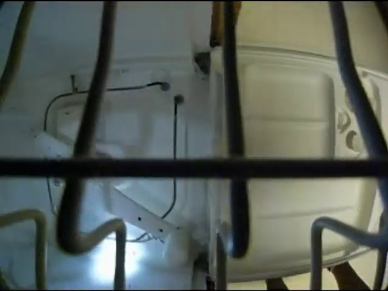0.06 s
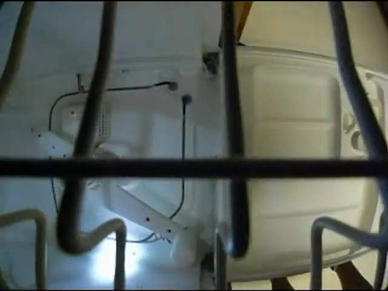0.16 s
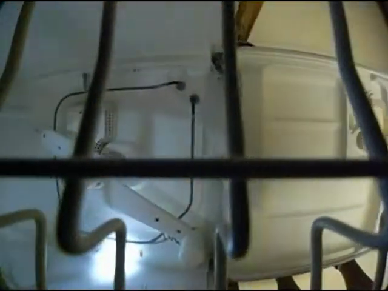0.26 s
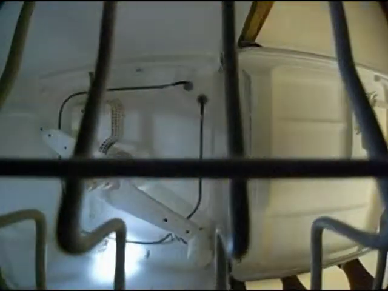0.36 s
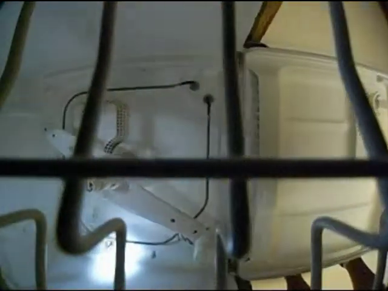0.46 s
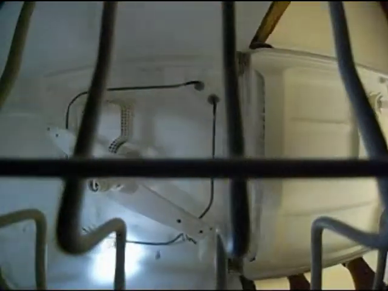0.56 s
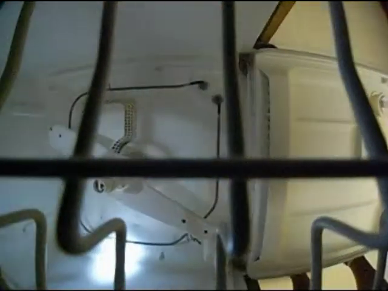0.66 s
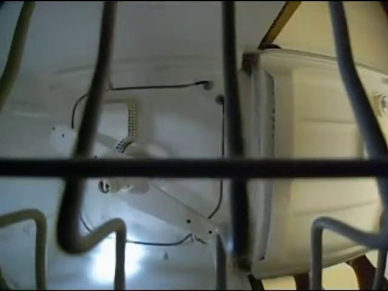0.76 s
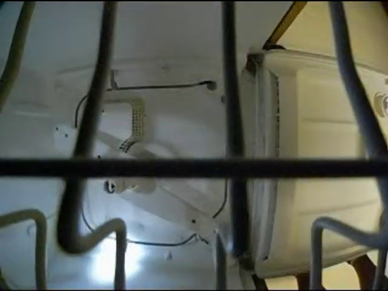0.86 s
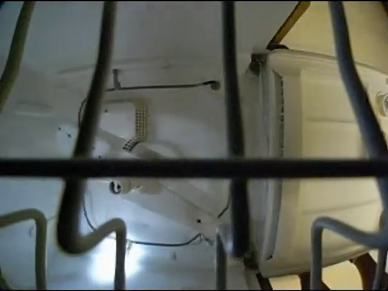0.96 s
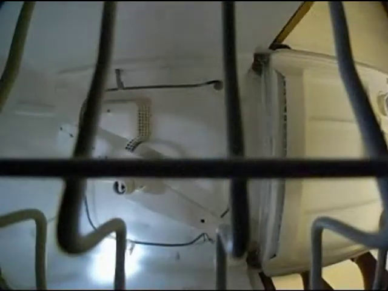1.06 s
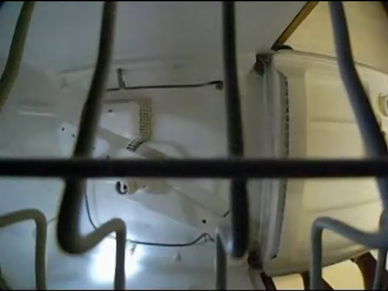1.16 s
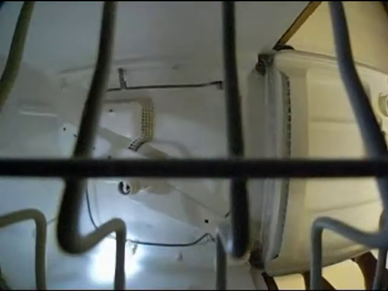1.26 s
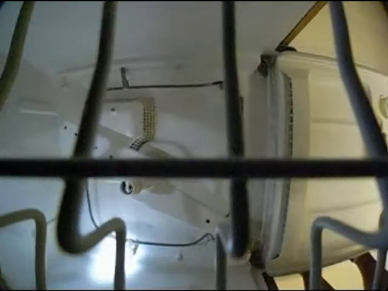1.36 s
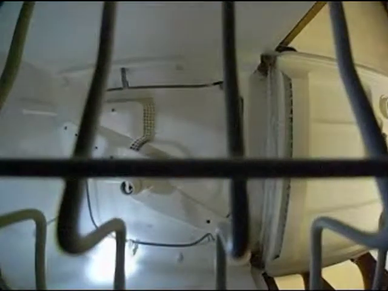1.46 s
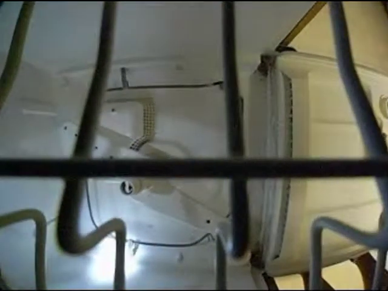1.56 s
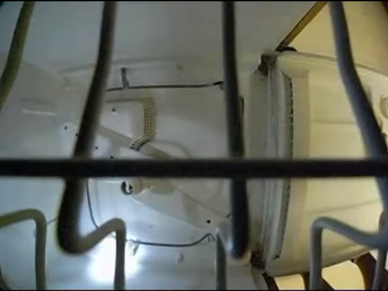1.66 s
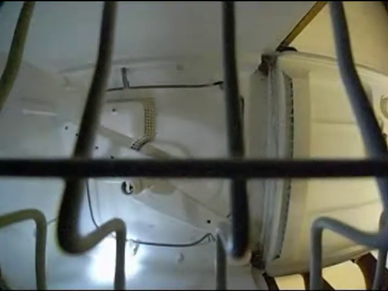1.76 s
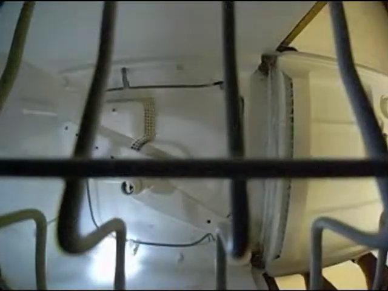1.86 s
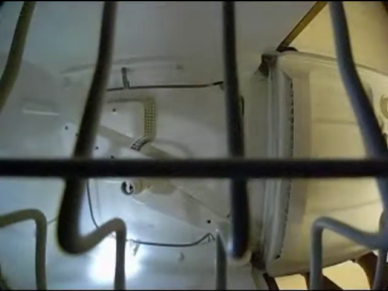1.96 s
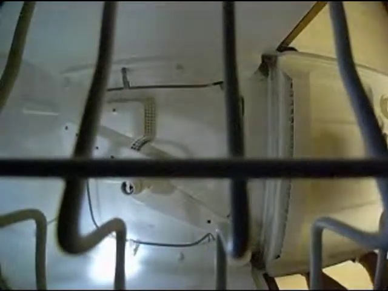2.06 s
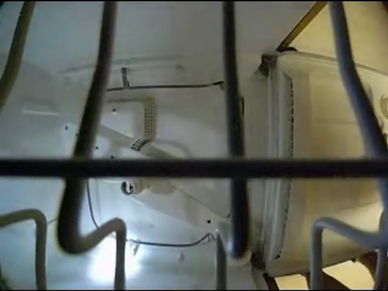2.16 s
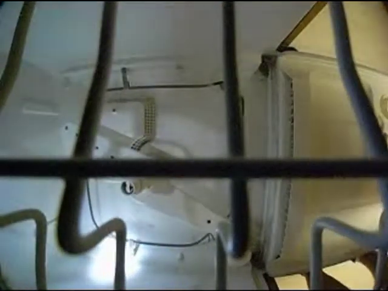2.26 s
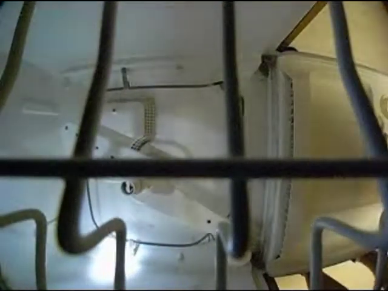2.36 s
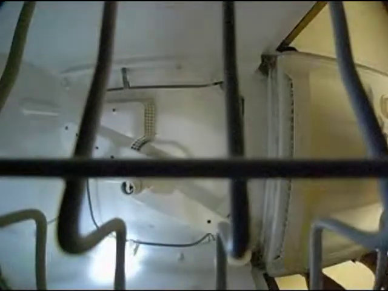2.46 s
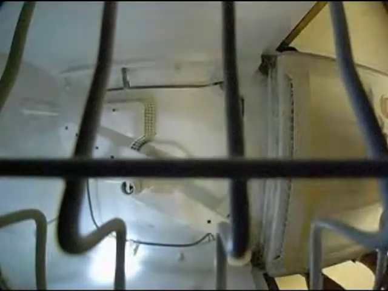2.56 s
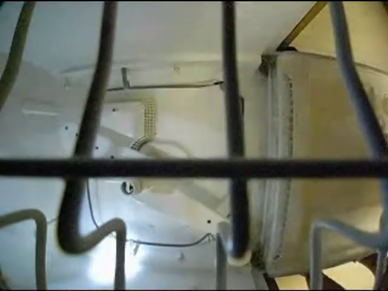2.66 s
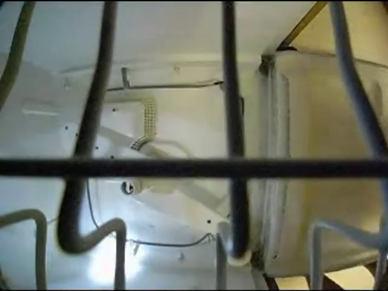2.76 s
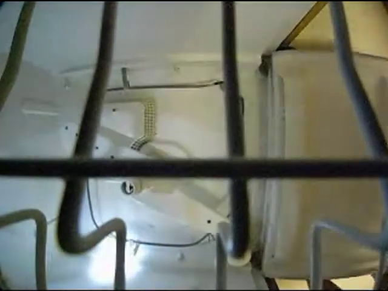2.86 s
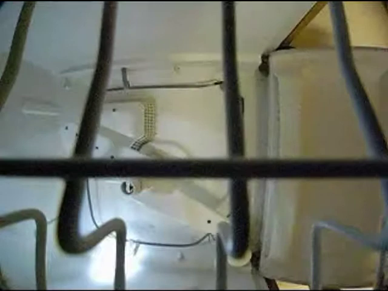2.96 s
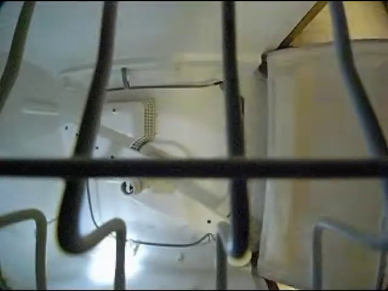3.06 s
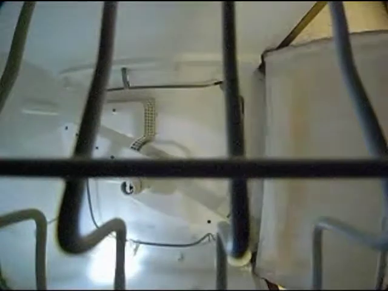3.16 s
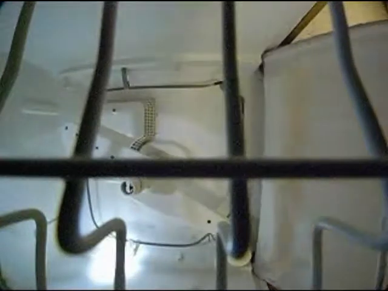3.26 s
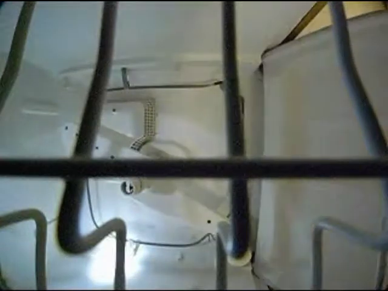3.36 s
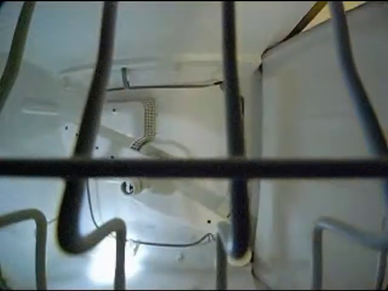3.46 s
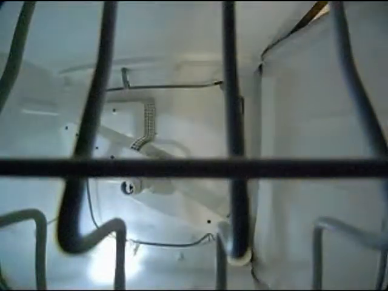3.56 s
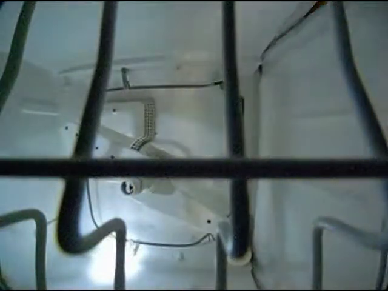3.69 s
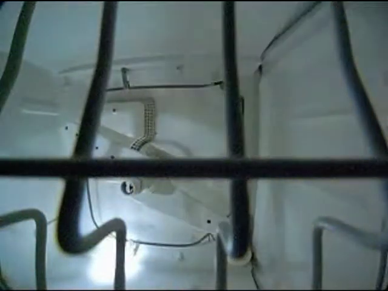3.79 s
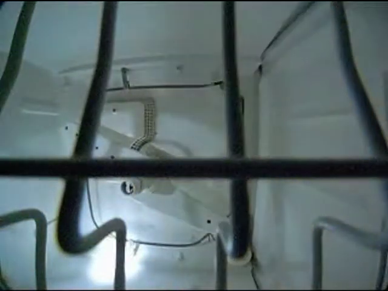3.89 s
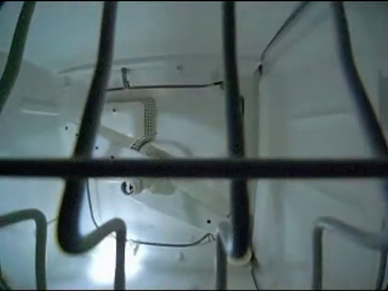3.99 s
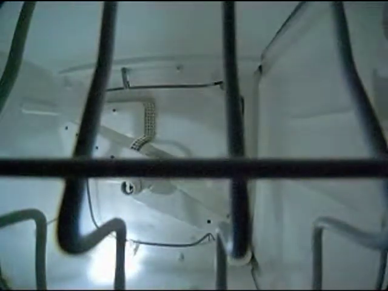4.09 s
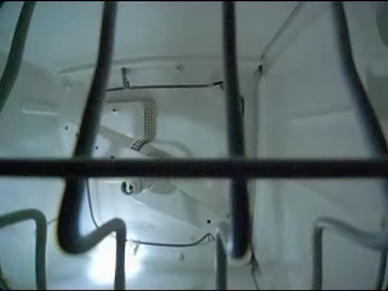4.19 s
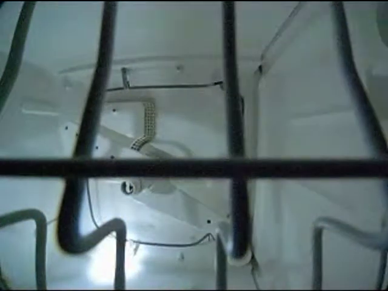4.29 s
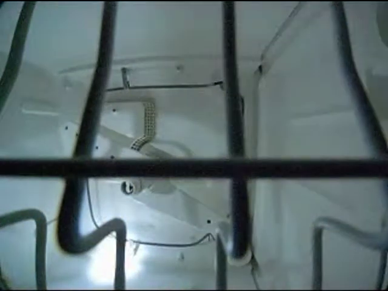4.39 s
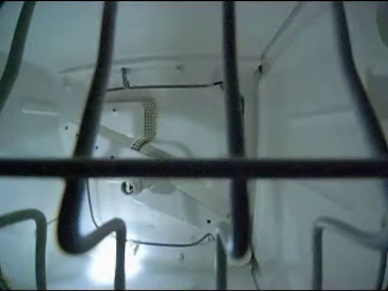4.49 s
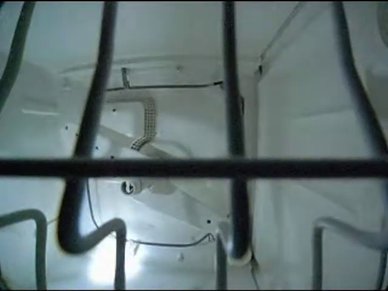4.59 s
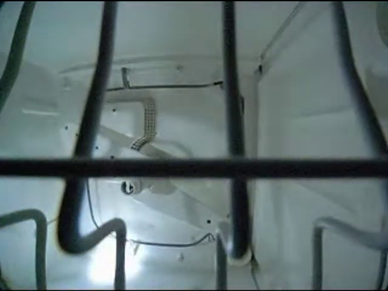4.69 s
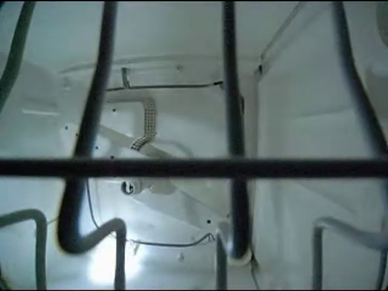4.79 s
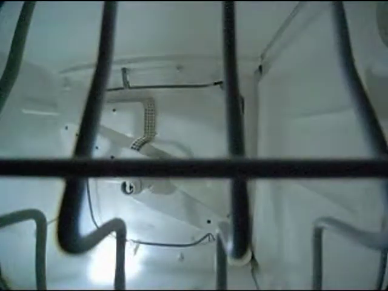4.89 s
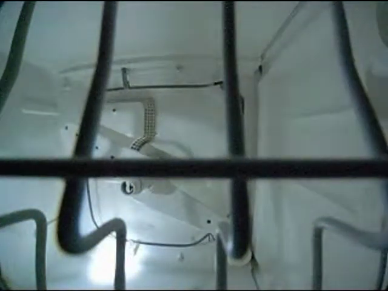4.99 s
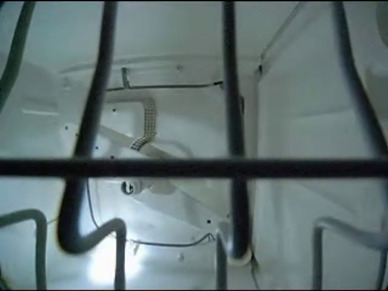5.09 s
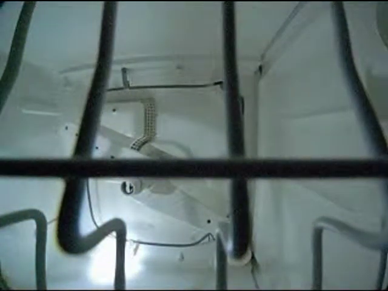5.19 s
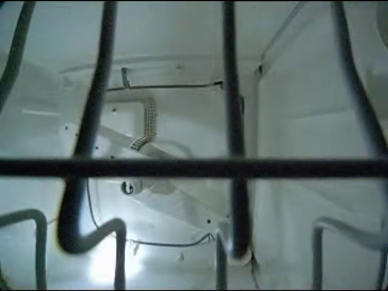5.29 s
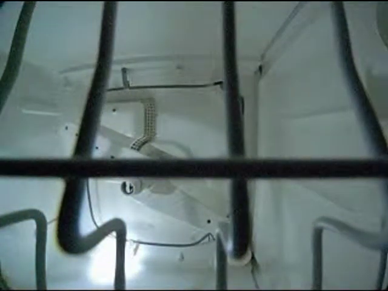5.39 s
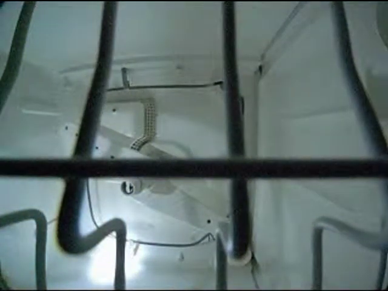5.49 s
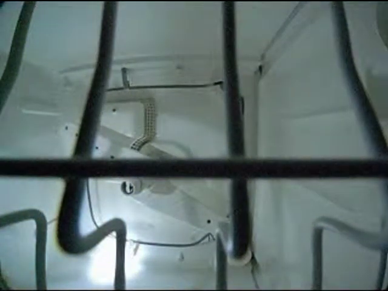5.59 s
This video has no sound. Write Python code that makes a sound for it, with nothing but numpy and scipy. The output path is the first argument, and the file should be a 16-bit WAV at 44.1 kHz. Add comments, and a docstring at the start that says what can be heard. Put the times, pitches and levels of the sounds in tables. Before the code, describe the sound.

A close microphone inside the resonant tub catches a rack rumbling loudly over rails, jolting unevenly and stopping with a metallic knock. The door then moves almost silently, with only low, soft thuds. It shuts in a hard, dull bang and double latch snap; a second, weaker scrape, knock and rattle follows, fading into steady soft hiss.

```python
"""Inside a dishwasher: a wire rack rolls in over its rails, chirps and skids, bumps to a stop and rings on.
The door swings up with dull thuds, knocks shut with a latch click, and the latch is scraped and rattled home.
Streams of random jolts, filtered by the tub's resonances, make the rolling and shaking; single blows make
the knocks. Struck metal is decaying sines, sliding is filtered micro-slips, thuds and hiss are filtered noise."""
import sys
import numpy as np
from scipy import signal
from scipy.fft import rfft, irfft, next_fast_len
from scipy.io import wavfile
from scipy.ndimage import uniform_filter1d

SR = 44100
rng = np.random.default_rng(int(sys.argv[2]) if len(sys.argv) > 2 else 0)


def digitize_waveform(pressure):
    """Quantize a signal to 16-bit integers and store it at the path in sys.argv[1].

    Rows of a 2-D input are taken as channels; values are limited to [-1, 1].
    """
    field = np.atleast_2d(pressure).T
    bounded = np.clip(field, -1, 1)
    quanta = np.round(bounded * 32767).astype(np.int16)
    wavfile.write(sys.argv[1], SR, quanta)


N = 248724
TIME = np.arange(N) / SR

# Background and tub
# colour of the steady hiss: f/Hz, level/dB
HISS_COLOUR = [(25, -13), (120, -2), (400, -1), (550, -9), (1000, -12.5), (2700, -20), (5000, -30),
               (6500, -41), (10000, -46.5)]
# resonances of the tub: f/Hz, width/Hz, lift/dB
TUB_RESONANCES = [(78.7, 6.8, 8), (124.2, 6.6, 6.5), (188, 6.7, 1.5), (217, 28, 8), (296.8, 15.5, 6.5),
                  (366.2, 22.4, 8.5), (404.6, 29.3, 7.5), (580, 30.6, 7.5), (850, 31, 5.5), (1122, 22, 4),
                  (1297, 40, 6.5), (1584, 120, 7.5)]

# Latch
# latch bar sliding: t/s, level/dB before the fade, f/Hz of the rubbed part
LATCH_SLIDES = [(4.150, -37.5, 1210), (4.639, -39.5, 2910)]
# colour of the sliding latch bar: f/Hz, level/dB
LATCH_SLIDE_COLOUR = [(150, -4), (400, 12.5), (750, -5), (1400, 0), (2100, -9.5), (3500, -15.5),
                      (5500, -18.5), (6500, -29), (11500, -34.5)]
# latch snapping over its catch: t/s, peak level/dB
LATCH_SNAPS = [(4.2158, -13), (4.2195, -9)]
# ring of the snapping latch: f/Hz, level/dB, t60/s
LATCH_SNAP_MODES = [(980, 16, 0.0038), (1376, 3, 0.021), (1700, 0, 0.029), (2100, 1, 0.03),
                    (2476, 1.5, 0.018), (2600, -16, 0.026), (2740, -5.5, 0.025), (3530, -15, 0.026),
                    (4260, -18.5, 0.016), (5365, -13.5, 0.024), (5890, -14, 0.018), (6300, -21, 0.029),
                    (10540, -24, 0.04)]
# latch rattling in its catch: t/s, relative level/dB
LATCH_RATTLES = [(2.871, -42), (4.1895, -16.5), (4.3198, -25.5), (4.352, -25), (4.7585, -18.5),
                 (4.8514, -27), (4.866, -28), (4.8999, -20.5), (4.977, -35), (5.167, -48)]
# ring of the rattling latch: f/Hz, level/dB, t60/s
LATCH_RATTLE_MODES = [(1000, 4, 0.074), (1255, 15, 0.021), (1565, 7, 0.038), (2180, -7, 0.03),
                      (2700, -12.5, 0.025), (3840, -24, .02), (6570, -13, 0.025), (9300, -24.5, 0.039)]

# Door
# how hard the swinging door shakes the tub: t/s, level/dB
DOOR_SWING = [(2.5, -53), (2.8, -53.5), (2.95, -42.5), (3.5, -52), (3.948, -70), (4.1, -82)]
# broad colour of the door: f/Hz, level/dB
DOOR_BODY_COLOUR = [(20, -28), (50, 1.5), (100, 1.5), (180, -0.5), (320, -1.5), (430, 1), (520, -6),
                    (1000, -15), (1600, -36), (2400, -36), (3600, -61.5), (7500, -48), (12500, -67)]
# door shuddering as it is lifted, as it shuts and as the latch is worked:
# t/s, level/dB, attack/s, hold/s, fade/(dB per s), clatter level/dB, latch chatter level/dB
DOOR_SHUDDERS = [(2.542, -36.5, 0.087, 0.051, 83, -22, -27), (4.162, -22.5, 0.071, 0.014, 37, -14, -21),
                 (4.689, -27, 0.038, 0.2, 99, -11.5, -21), (4.982, -32, 0.027, 0.085, 262, -14, -44),
                 (5.159, -39.5, 0.0075, 0.0087, 57, -13, -35)]
# door knocking on hinges, seal and frame: t/s, relative level/dB, bass lift/dB, treble lift/dB
DOOR_BLOWS = [(2.612, -25, 7, 2), (4.151, -41, -7, 7), (4.173, -10, -3.5, 1), (4.188, -0.5, -7, 3.5),
              (4.227, -8, 9, -7), (4.315, -8.5, 5, -9), (4.707, -22.5, -11, -18), (4.757, -14.5, -7.5, 4),
              (4.883, -12, 4, 4), (4.978, -22, -2, 6)]
# ring of the door panel after the slam: f/Hz, level/dB, t60/s
DOOR_PANEL_MODES = [(79.2, -23.5, 0.86), (172.7, -20, 0.8), (198.8, -17.5, 0.8), (243.5, -28, 1.0),
                    (388, -17.5, 0.54), (473, -24, 0.25), (570, -29, 0.44)]
# door panels flexing: t/s, level/dB before swell and fade, f/Hz, t60/s, width/octaves
PANEL_THUDS = [(2.386, -32, 109, 0.46, 0.38), (2.66, -27, 216, 0.32, 0.19),
               (3.216, -32, 127.5, 0.26, 0.094), (5.339, -25, 372, 0.23, 0.26)]

# Rack
# how hard the rolling rack shakes the tub: t/s, level/dB
RACK_ROLL = [(0.0, -18), (0.354, -24.5), (0.418, -23.5), (0.592, -29), (0.702, -31.5), (1.4, -32),
             (1.524, -36), (1.614, -20), (1.79, -30.5)]
# broad colour of the rack: f/Hz, level/dB
RACK_BODY_COLOUR = [(20, -17.5), (45, -18), (75, -3), (220, -0.5), (370, 0.5), (490, -4.5), (700, -16.5),
                    (1200, -28), (1800, -45.5), (2150, -41), (2600, -44.5), (4000, -56), (5400, -56),
                    (6300, -63), (7400, -51), (8500, -53.5), (12500, -89)]
# wheels and rack bumping along the rails: t/s, relative level/dB, bass lift/dB, treble lift/dB
RACK_BUMPS = [(.024, -12.5, -15.5, 7.5), (.047, -6.5, -3, -2.5), (.076, -3, -10.5, 7.5),
              (.126, -5.5, -19.5, 4), (.246, -12, -1, 12.5), (.334, -4, 4, 7.5), (.384, -10, -4.5, 2.5),
              (.409, -2.5, 4.5, -9), (.436, -5, 9, 14), (.466, -4.5, 4.5, 13), (.488, -0.5, 3, 6),
              (.6, -11, 1, -3), (.789, -2.5, 5, 3.5), (.824, -4, 3.5, 5.5), (.952, -10, 13.5, 11),
              (1.032, 1.5, 4, 5.5), (1.043, -1.5, -2.5, 0), (1.224, -13, -8, 6.5), (1.288, 3, -5.5, 3),
              (1.3, -0.5, -9, 0.5), (1.337, -1.5, 11.5, 6), (1.381, 2, 3, 5.5), (1.553, -2, -18, 3),
              (1.577, 0.5, 0.5, 3), (1.69, -12.5, -15, 13.5), (1.721, -8.5, -2, 1),
              (1.765, -11.5, 11, 11.5)]
# wheels skidding on the rails: t/s, level/dB before the fade, f/Hz of the rubbed wire
WHEEL_SKIDS = [(.405, -38, 2920), (.465, -46.5, 3800), (.788, -38, 2870), (1.028, -37.5, 2350),
               (1.286, -36.5, 3720), (1.556, -55, 2290)]
# colour of the skidding wheels: f/Hz, level/dB
SKID_COLOUR = [(400, -18), (1400, -1.5), (2700, 3.5), (5400, -3), (6400, -26), (9500, -20.5),
               (11500, -16.5)]
# wheels and rack fittings chirping as they catch: t/s, relative level/dB, pitch ratio of the low partials
CHIRPS = [(.089, -45.5, 1.05), (.343, -48, 0.93), (.499, -36.5, 1), (.555, -53, 0.83), (0.588, -51, 1),
          (0.948, -48.5, 0.95), (1.127, -55, 0.97), (1.284, -47, 1.4), (1.309, -35, 0.77),
          (1.322, -34.5, 0.95), (1.513, -51.5, 0.99), (1.577, -46, 0.89), (1.79, -55, 0.88),
          (4.439, -53.5, 0.97)]
# low partials of a chirp, which follow its pitch ratio: f/Hz, level/dB
CHIRP_LOW_PARTIALS = [(2380, 4.5), (2660, 2.5)]
# high partials of a chirp, which barely move: f/Hz, level/dB
CHIRP_HIGH_PARTIALS = [(5580, -9), (10550, -19.5)]
# rack meeting its end stop: t/s, peak level/dB
END_STOP_HITS = [(1.72, -12.5)]
# ring of the rack at its end stop: f/Hz, level/dB, t60/s
END_STOP_MODES = [(800, 2.5, 0.047), (900, 2.5, 0.04), (1320, 7, 0.029), (1636, -3.5, 0.041),
                  (2135, 1, 0.022), (2510, -9, 0.02), (2880, -10.5, 0.018), (4950, -23, 0.021),
                  (5850, -16, 0.027), (6660, -18, 0.035), (9400, -26, 0.036), (10400, -31, 0.041)]
# blows that set the wires ringing: t/s, level/dB
WIRE_STRIKES = [(1.383, -4.5), (1.72, -1), (4.19, 1)]
# long ring of the rack wires: f/Hz, level/dB relative to the blow, t60/s, pitch spread as a share
RACK_WIRES = [(53.2, -40.5, 1.6, 0.06), (204, -41, 1.76, .05), (278, -42, 3.53, 0.055),
              (314, -39, 2.7, 0.07), (397.7, -38.5, 2.58, 0.0034), (864, -44.5, 0.73, 0.0046)]

HISS_DB = -51.5
CUTOFF_HZ = 12900
TUB_T60_S = 0.5
# shaking dies away at a steady rate once the push ends
RACK_FADE_DB_PER_S, DOOR_FADE_DB_PER_S = 76, 55
# the rack's bass falls steadily
BASS_FALL_DB_PER_S = 4
# how unevenly the many close modes answer shaking, knocks and sliding
PANEL_RING_DB, KNOCK_RING_DB, SLIDING_RING_DB = 3, 6, 6
UPPER_MODES_HZ = 600  # the unevenness of shaking and knocks begins here
# the rubbed part rings in one broad resonance
RUB_LIFT_DB, RUB_WIDTH_OCTAVES = 8, 0.32
# small touches of the loose latch while the door shakes
CHATTER_PER_S, CHATTER_SPREAD_DB = 100, 2
SLAM_S, THUD_RISE_S = 4.189, 0.036
# a chirp swells briefly and rasps (depth of its flutter)
CHIRP_SWELL_S, CHIRP_RASP = 0.0033, 0.8


def from_db(db):
    """Decibels to gain."""
    return 10 ** (np.asarray(db) / 20)


def rms_one(x):
    """Scale to unit power."""
    return x / np.sqrt(np.mean(x ** 2) + 1e-20)


def levelled(x):
    """Even out the loudness over a sliding 1800-sample window."""
    return x / np.sqrt(uniform_filter1d(x ** 2, size=1800) + 1e-20)


def dying(t, t60):
    """Exponential decay, 60 dB down at t60."""
    return np.exp(-np.log(1000) * t / max(t60, 1e-3))


def add(out, s, sound):
    """Mix a sound in at time s."""
    start = max(round(s * SR), 0)
    out[start:start + len(sound)] += sound[:N - start]


def at_hz(points, hz):
    """Read a spectrum on a log-frequency axis."""
    points = np.array(points)
    return np.interp(np.log(hz), np.log(points[:, 0]), points[:, 1])


def coloured(x, response_db):
    """Causal (minimum-phase) filter with the given dB response, so that peaks ring after a blow."""
    size = 2 * next_fast_len(len(x) // 2 + 4096)
    hz = np.maximum(np.arange(size // 2 + 1) * SR / size, 1)
    cepstrum = irfft(np.log(from_db(response_db(hz))))
    # folding the cepstrum forward in time gives minimum phase
    cepstrum[1:size // 2] *= 2
    cepstrum[size // 2 + 1:] = 0
    return irfft(rfft(x, size) * np.exp(rfft(cepstrum)))[:len(x)]


def band(x, low_hz, high_hz):
    """Band-pass."""
    return signal.sosfilt(signal.butter(2, [low_hz, high_hz], "band", fs=SR, output="sos"), x)


def ripple(depth_db, size):
    """Many close resonances, driven unevenly: a random dB response from bass to treble."""
    grid_hz = np.linspace(0, CUTOFF_HZ, size)
    lift_db = depth_db * rng.uniform(-1.28, 1, size)
    return lambda hz: np.interp(hz, grid_hz, lift_db)


def in_tub(colour, hz):
    """dB response of a part sounding through the tub's resonances."""
    lifts = [lift / (1 + (2 * (hz - centre) / width) ** 2) for centre, width, lift in TUB_RESONANCES]
    return at_hz(colour, hz) + sum(lifts)


def contacts(size, per_s, spread_db):
    """Random small contacts of uneven strength; rms 1."""
    strength = from_db(spread_db * np.minimum(rng.exponential(1, size), 3))
    strength = strength * rng.choice([-1, 1], size)
    return rms_one(strength * (rng.random(size) < per_s / SR))


def ringing(modes, t):
    """Free ring of a struck part: decaying sines, each with a slightly random strength."""
    hz, mode_db, t60 = np.transpose(modes)
    gains = from_db(mode_db + rng.uniform(-2, 2, len(hz))) * rng.choice([-1, 1], len(hz))
    return sum(g * np.sin(2 * np.pi * f * t) * dying(t, d) for g, f, d in zip(gains, hz, t60))


def pushed(curve, fade_db_per_s):
    """Level in dB of shaking that follows a push and then dies away."""
    s, level_db = np.transpose(curve)
    after_push = np.maximum(TIME - s[-1], 0)
    return np.interp(TIME, s, level_db, left=-120) - fade_db_per_s * after_push


def rumble(shaking, colour, per_s, spread_db, body_db, bass_db, clatter_db):
    """A stream of small jolts shakes the tub: a bass drone, booming panels and clattering light parts."""
    jolts = contacts(N, per_s, spread_db)
    panel_lift = ripple(PANEL_RING_DB, size=600)
    shaken = coloured(jolts, lambda hz: in_tub(colour, hz) + panel_lift(hz) * (hz > UPPER_MODES_HZ))
    out = np.zeros(N)
    for level_db, low, high in [(bass_db, 25, 160), (body_db, 160, 580), (clatter_db, 580, 14000)]:
        band_filter = signal.butter(2, [low, high], "band", fs=SR, output="sos")
        out += from_db(level_db) * levelled(signal.sosfiltfilt(band_filter, shaken))
    return out * shaking


def knocks(table, colour, strike, chatter_per_s, chatter_t60, rise_s, tail_db, bass_hz, bright_hz):
    """Each knock is one blow, a dying chatter of rebounds and the echo inside the tub."""
    out, t = np.zeros(N), TIME[:SR * 3 // 4]
    for s, level_db, bass_db, bright_db in table:
        force = contacts(len(t), chatter_per_s, spread_db=2.5) * dying(t, chatter_t60)
        force += from_db(tail_db) * rng.standard_normal(len(t)) * dying(t, TUB_T60_S)
        force[SR // 1000] += strike * np.linalg.norm(force)
        force *= 1 - np.exp(-t / max(rise_s, 1e-4))  # a cushioned contact swells slowly
        # the force is made even across pitch, so the colour is that of the struck part
        force_db = 10 * np.log10(uniform_filter1d(np.abs(rfft(force)) ** 2, size=91))
        mode_lift = ripple(KNOCK_RING_DB, size=240)  # each contact point favours other modes

        def response_db(hz):
            bass_shelf = bass_db / (1 + (hz / bass_hz) ** 4)
            treble_shelf = bright_db / (1 + (bright_hz / hz) ** 4)
            part = in_tub(colour, hz) + bass_shelf + treble_shelf
            upper_modes = mode_lift(hz) * (hz > UPPER_MODES_HZ)
            return part + upper_modes - np.interp(hz * len(t) / SR, np.arange(len(force_db)), force_db)

        knock = rms_one(coloured(force, response_db)) * np.sqrt(chatter_t60 / 10)
        add(out, s, from_db(level_db) * knock)
    return out


def clicks(table, modes, crack_db, crack_t60, rise_s):
    """A small hard part is struck: a brief crack in its own colour, and modes that build up during contact."""
    out, t = np.zeros(N), TIME[:SR // 6]
    for s, peak_db in table:
        burst = rng.standard_normal(len(t)) * dying(t, crack_t60)
        grit = coloured(burst, lambda hz: at_hz(modes, hz))
        crack = rms_one(band(grit, modes[0][0], CUTOFF_HZ))
        ring = ringing(modes, t) * (1 - np.exp(-t / max(rise_s, 1e-5)))
        sound = rms_one(ring) + from_db(crack_db) * crack
        add(out, s, from_db(peak_db) * sound / np.abs(sound).max())
    return out


def scrapes(table, colour, t60, rise_s, slips_per_s):
    """Sliding contact: uneven micro-slips ring in the rubbed part and in many close resonances."""
    out, t = np.zeros(N), TIME[:SR // 2]
    for s, level_db, ring_hz in table:
        close_lift = ripple(SLIDING_RING_DB, size=180)
        slips = contacts(len(t), slips_per_s, spread_db=2.5)

        def response_db(hz):
            rub = RUB_LIFT_DB * np.exp(-(np.log2(hz / ring_hz) / RUB_WIDTH_OCTAVES) ** 2)
            return at_hz(colour, hz) + close_lift(hz) + rub

        rasp = rms_one(coloured(slips, response_db))
        add(out, s, from_db(level_db) * rasp * (1 - np.exp(-t / rise_s)) * dying(t, t60))
    return out


def hiss():
    """Faint steady background: noise that falls off towards the treble."""
    noise = coloured(rng.standard_normal(N), lambda hz: at_hz(HISS_COLOUR, hz))
    return from_db(HISS_DB) * rms_one(noise)


def latch():
    """The latch bar slides in rough micro-slips, snaps over its catch and rattles as struck metal."""
    slides = scrapes(LATCH_SLIDES, LATCH_SLIDE_COLOUR, t60=0.48, rise_s=0.00071, slips_per_s=2100)
    snaps = clicks(LATCH_SNAPS, LATCH_SNAP_MODES, crack_db=-1.5, crack_t60=0.029, rise_s=0.0005)
    rattles = clicks(LATCH_RATTLES, LATCH_RATTLE_MODES, crack_db=-8.5, crack_t60=0.1, rise_s=0.00028)
    return slides + snaps + from_db(-1.5) * rattles


def thuds(skirt_db):
    """A flexing panel swells softly and booms in one broad resonance."""
    out, t = np.zeros(N), TIME[:SR // 2]
    for s, level_db, pitch_hz, t60, octaves in PANEL_THUDS:

        def response_db(hz):
            return skirt_db * np.log10(1 + (np.log2(hz / pitch_hz) / octaves) ** 2)

        boom = levelled(coloured(rng.standard_normal(len(t)), response_db))
        add(out, s, from_db(level_db) * boom * (1 - np.exp(-t / THUD_RISE_S)) * dying(t, t60))
    return out


def shudder(s, level_db, attack_s, hold_s, fade_db_per_s, clatter_db, chatter_db):
    """The door shakes in its frame (attack, hold, steady fade) and the loose latch chatters with it."""
    attack = np.clip((TIME - s) / attack_s, 0, 1)
    fading_s = np.maximum(TIME - s - attack_s - hold_s, 0)
    shaking = attack * from_db(level_db - fade_db_per_s * fading_s)
    ring = ringing(LATCH_RATTLE_MODES, TIME[:SR // 12])
    touches = shaking * contacts(N, CHATTER_PER_S, CHATTER_SPREAD_DB)
    chatter = signal.fftconvolve(touches, ring / np.linalg.norm(ring))[:N]
    boom = rumble(shaking, DOOR_BODY_COLOUR, per_s=1400, spread_db=-1.0,
                  body_db=-4.0, bass_db=-7.0, clatter_db=clatter_db)
    return boom + from_db(chatter_db) * chatter


def door():
    """The door swings up with soft thuds, knocks shut on its frame, shudders and rings in its panel."""
    out = rumble(from_db(pushed(DOOR_SWING, DOOR_FADE_DB_PER_S)), DOOR_BODY_COLOUR, per_s=2300,
                 spread_db=4.5, body_db=-4.5, bass_db=-9.0, clatter_db=-18.5)
    out += sum(shudder(*row) for row in DOOR_SHUDDERS)
    out += from_db(-6.0) * knocks(DOOR_BLOWS, DOOR_BODY_COLOUR, strike=0.23, chatter_per_s=1300,
                                  chatter_t60=0.066, rise_s=0.00048, tail_db=-32.0,
                                  bass_hz=164, bright_hz=576)
    add(out, SLAM_S, ringing(DOOR_PANEL_MODES, TIME[:SR]))
    return out + thuds(skirt_db=-29.0)


def wires(count):
    """The jolted rack hums on; nearly equal wires start together and beat against each other."""
    out = np.zeros(N)
    for s, blow_db in WIRE_STRIKES:
        for hz, level_db, t60, spread in RACK_WIRES:
            pitches = hz * (1 + spread * rng.uniform(-1, 1, count))
            hum = sum(np.sin(2 * np.pi * f * TIME) for f in pitches)
            add(out, s, from_db(blow_db + level_db) * rms_one(hum) * dying(TIME, t60))
    return out


def squeaks():
    """A wheel or fitting catches for an instant: a few rasping partials swell and die within milliseconds."""
    out, t = np.zeros(N), TIME[:SR // 20]
    swell = (t / CHIRP_SWELL_S * np.exp(1 - t / CHIRP_SWELL_S)) ** 2
    for s, level_db, pitch in CHIRPS:
        partials = [(pitch * hz, db) for hz, db in CHIRP_LOW_PARTIALS]
        partials += [(hz * rng.normal(1, .025), db) for hz, db in CHIRP_HIGH_PARTIALS]
        tone = sum(from_db(db) * np.sin(2 * np.pi * (hz * t + rng.random())) for hz, db in partials)
        rasp = rms_one(band(rng.standard_normal(len(t)), 100, 700))
        flutter = rms_one(1 + CHIRP_RASP * rasp)
        add(out, s, from_db(level_db) * swell * flutter * tone)
    return out


def rack():
    """The rack rolls, bumps, skids and chirps along its rails, meets the end stop and rings on."""
    out = rumble(from_db(pushed(RACK_ROLL, RACK_FADE_DB_PER_S)), RACK_BODY_COLOUR, per_s=1100, spread_db=3,
                 body_db=-4.5, bass_db=0.5 - BASS_FALL_DB_PER_S * TIME, clatter_db=-11.0)
    out += from_db(-8.5) * knocks(RACK_BUMPS, RACK_BODY_COLOUR, strike=0.38, chatter_per_s=1700,
                                  chatter_t60=0.12, rise_s=0.00096, tail_db=-8.5,
                                  bass_hz=165, bright_hz=586)
    out += scrapes(WHEEL_SKIDS, SKID_COLOUR, t60=0.19, rise_s=0.0028, slips_per_s=1500)
    out += squeaks()
    out += clicks(END_STOP_HITS, END_STOP_MODES, crack_db=-12, crack_t60=0.034, rise_s=0.0018)
    return out + wires(count=4)


def scene():
    """Faint steady hiss under latch, door and rack."""
    return (hiss() + latch() + door() + rack())[None]


def record(dry):
    """The microphone has a narrow notch in the treble; peaks are rounded and the top is cut."""
    notched = signal.lfilter(*signal.iirnotch(8000, 7, fs=SR), dry)
    rounded = 1.514 * np.tanh(notched / 1.521)
    return signal.sosfilt(signal.ellip(10, .2, 80, CUTOFF_HZ, fs=SR, output="sos"), rounded)


dry = scene()
out = record(dry)
digitize_waveform(out)
```